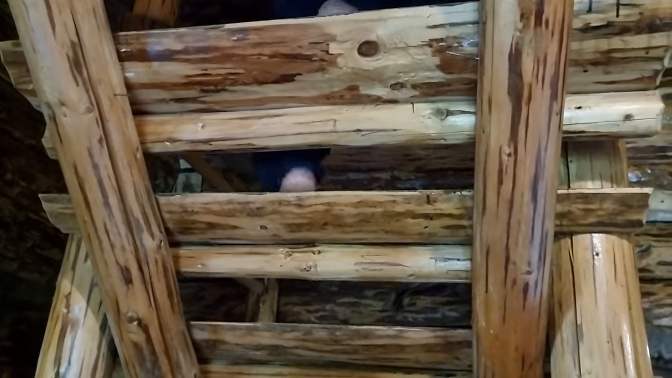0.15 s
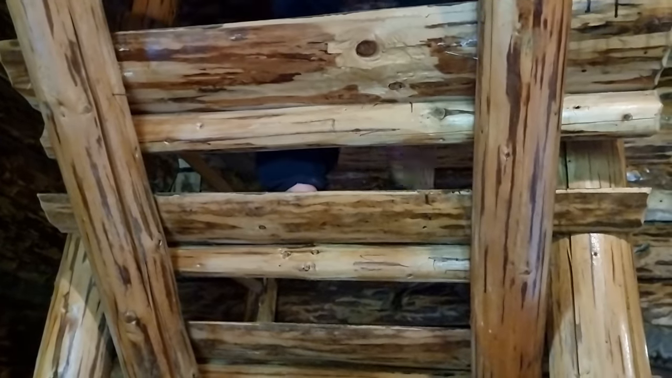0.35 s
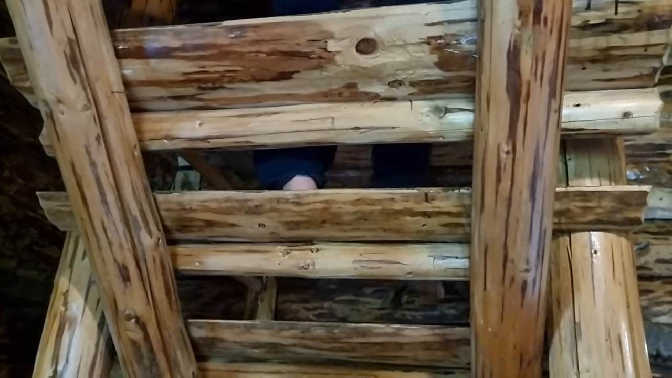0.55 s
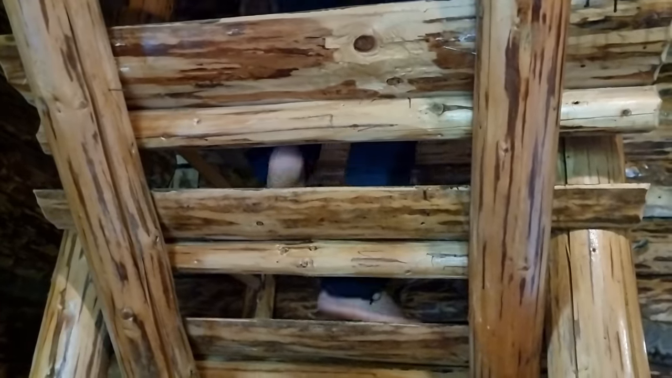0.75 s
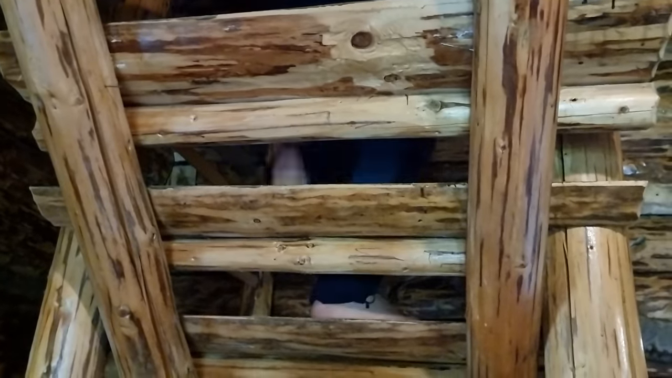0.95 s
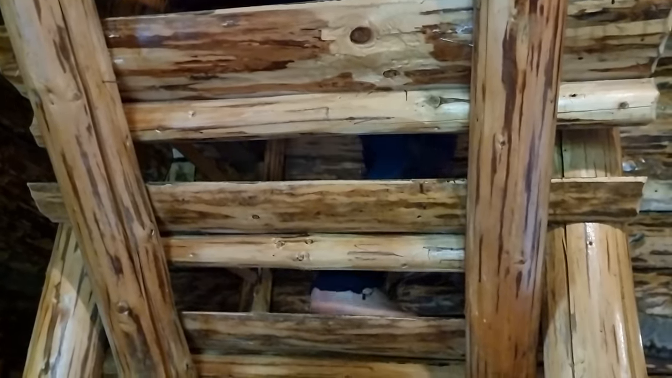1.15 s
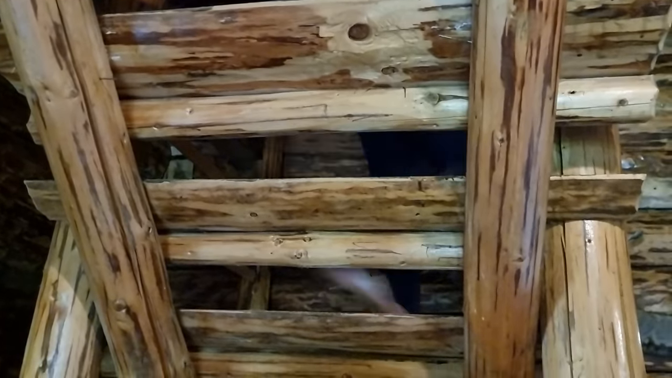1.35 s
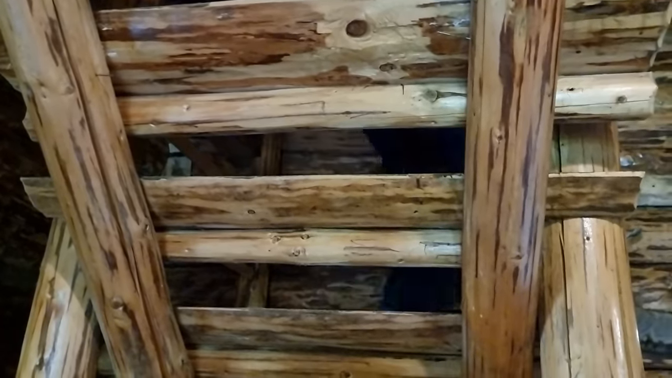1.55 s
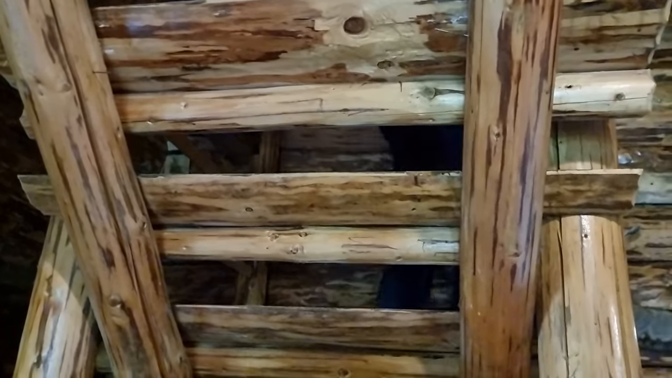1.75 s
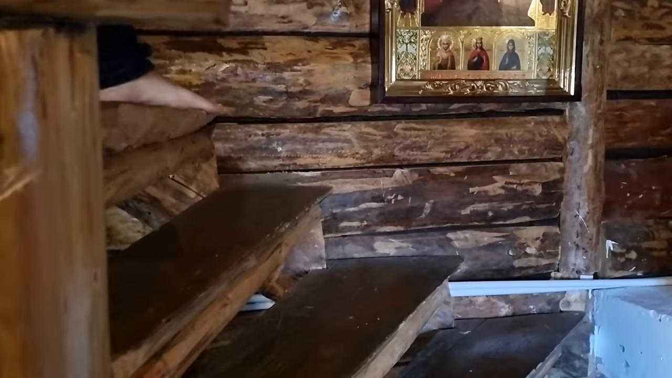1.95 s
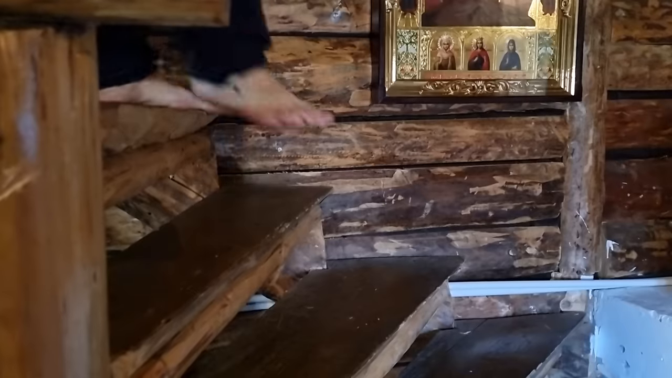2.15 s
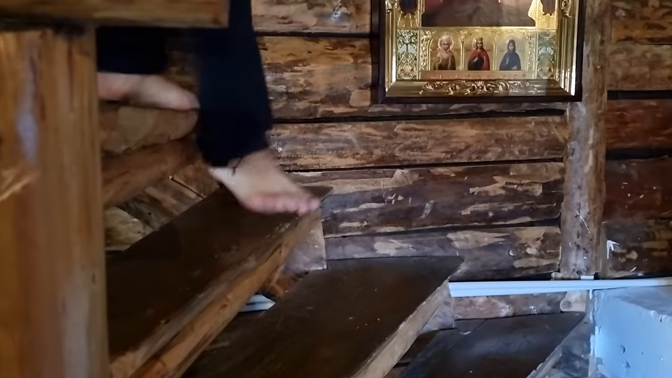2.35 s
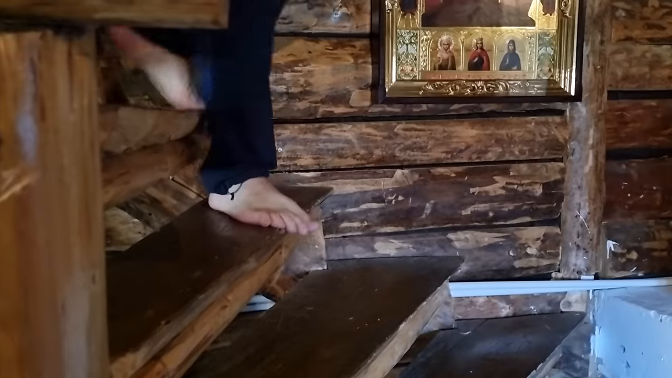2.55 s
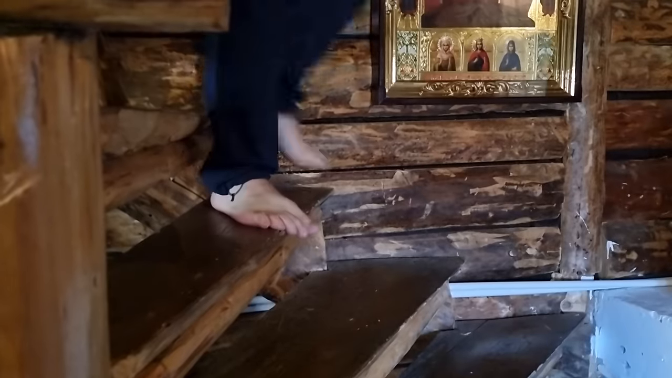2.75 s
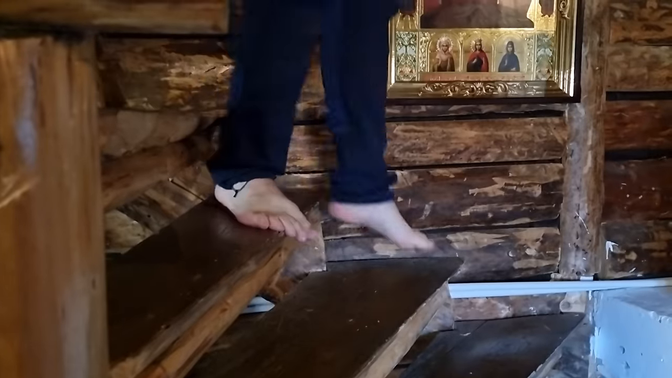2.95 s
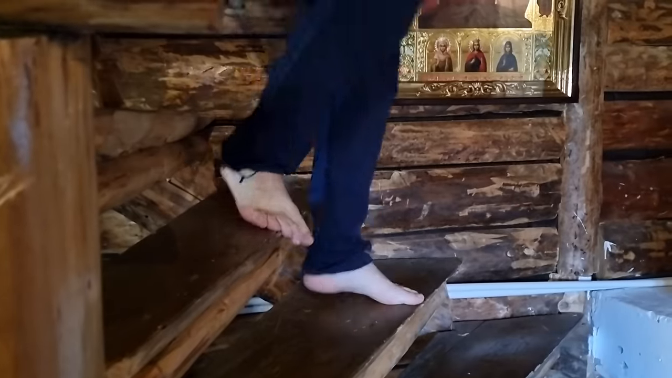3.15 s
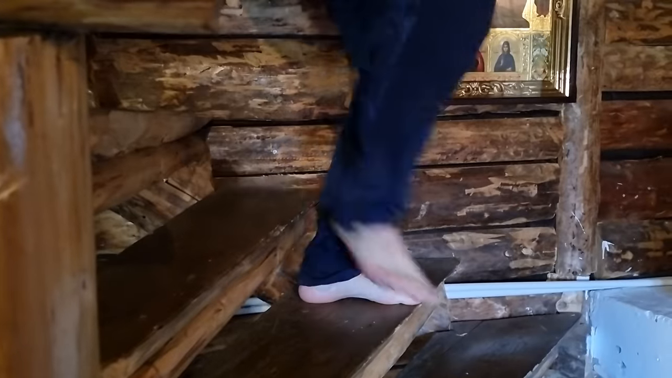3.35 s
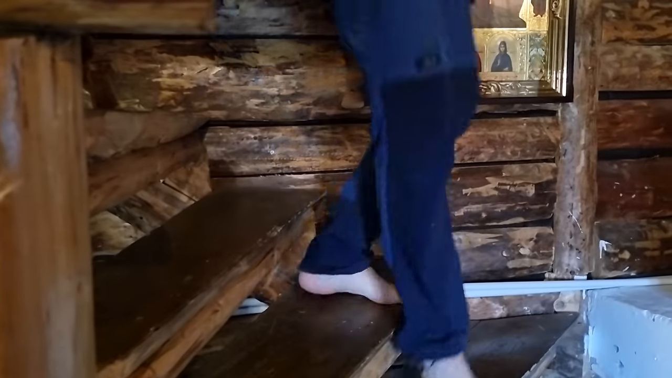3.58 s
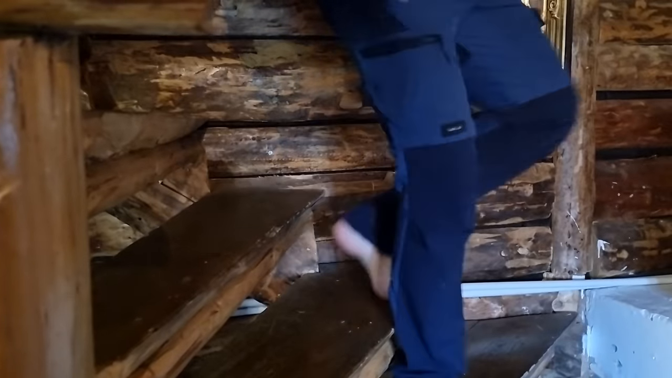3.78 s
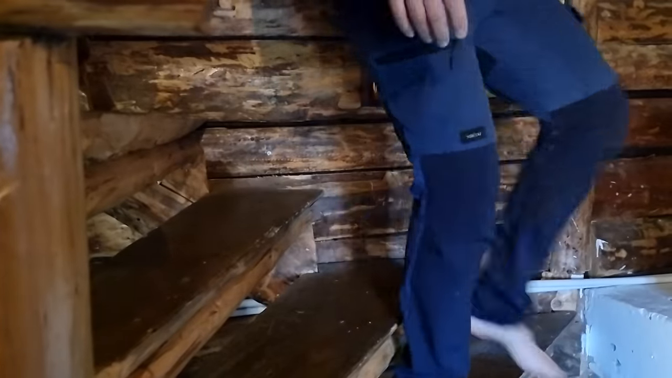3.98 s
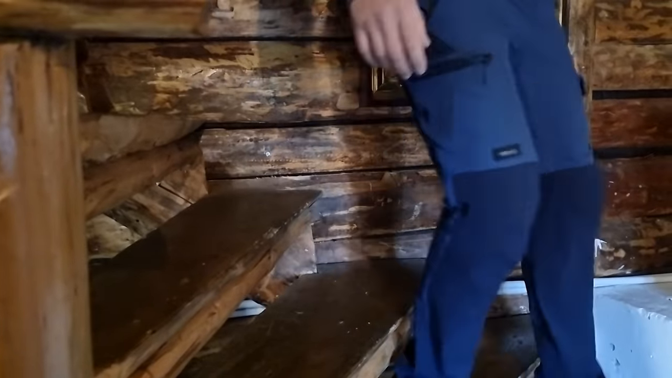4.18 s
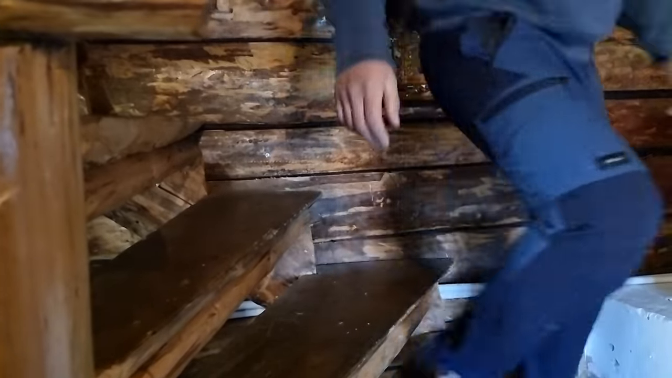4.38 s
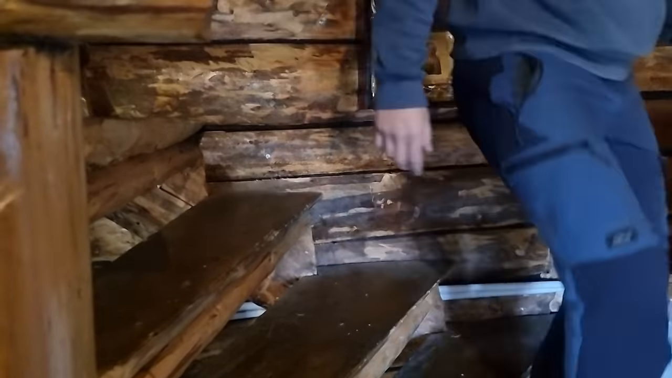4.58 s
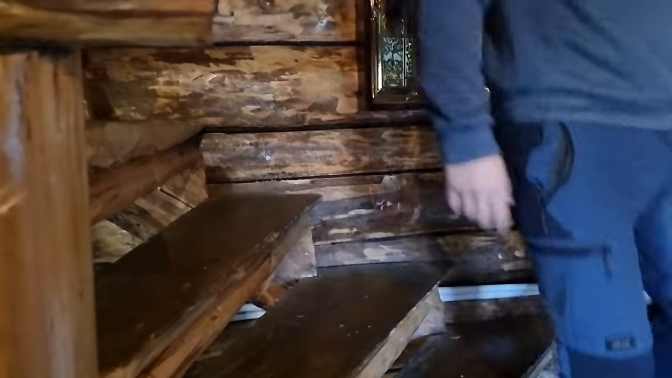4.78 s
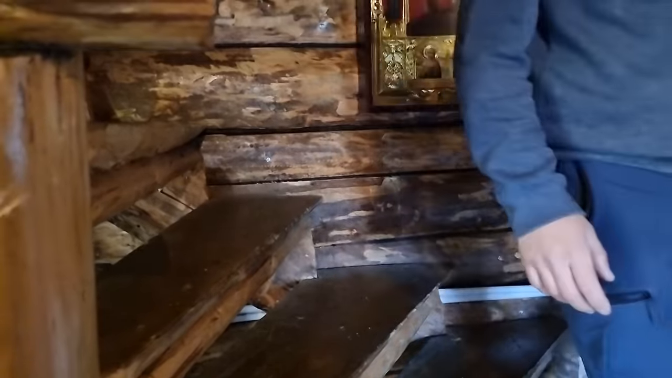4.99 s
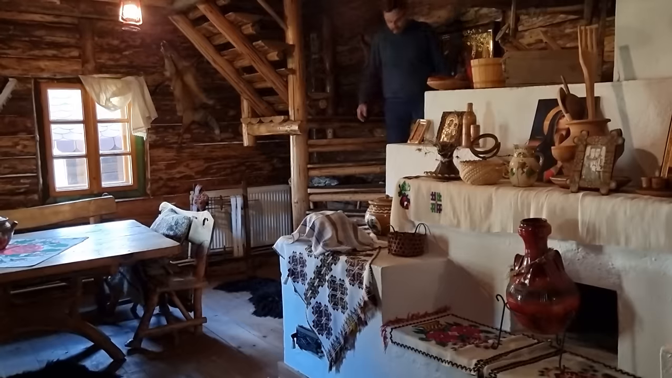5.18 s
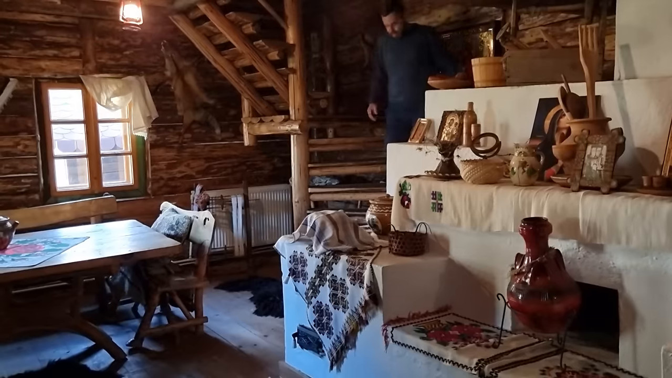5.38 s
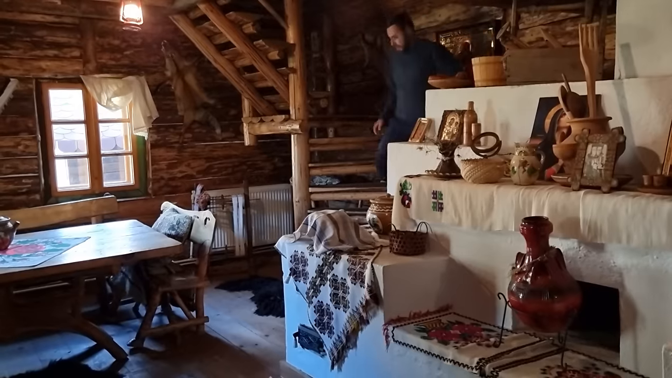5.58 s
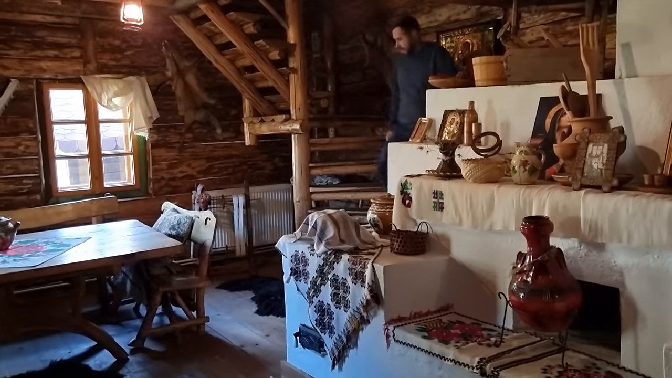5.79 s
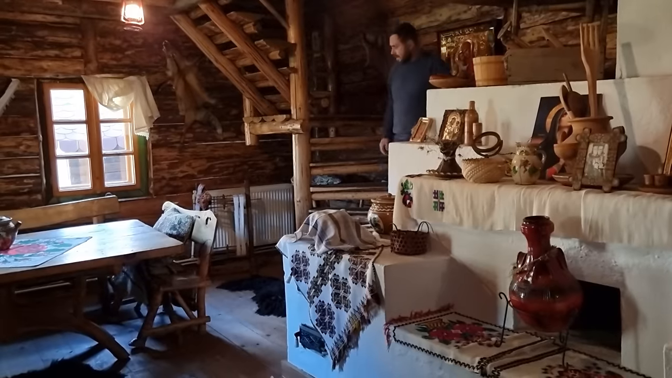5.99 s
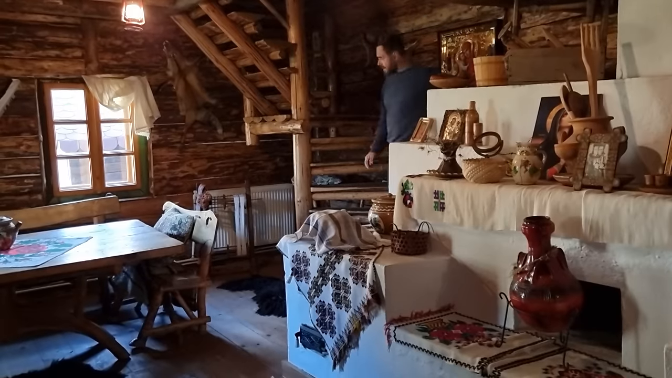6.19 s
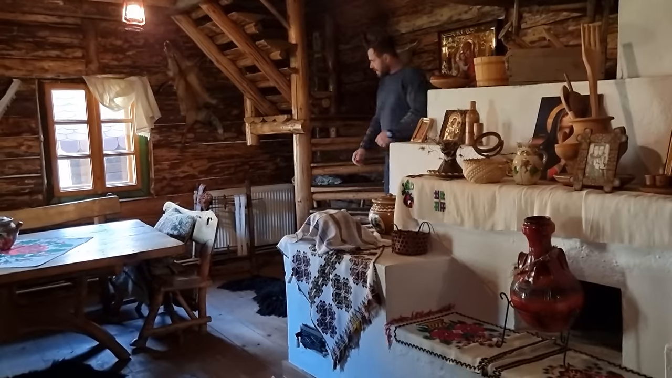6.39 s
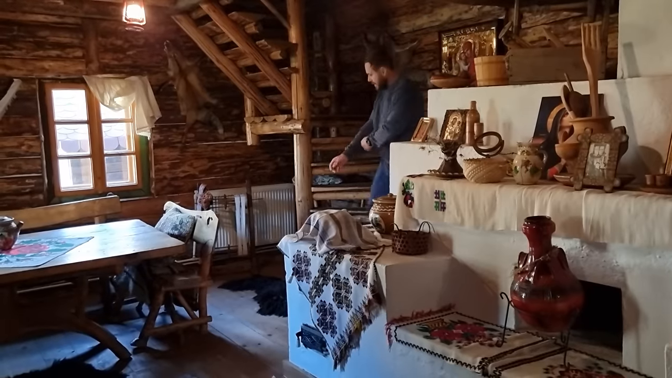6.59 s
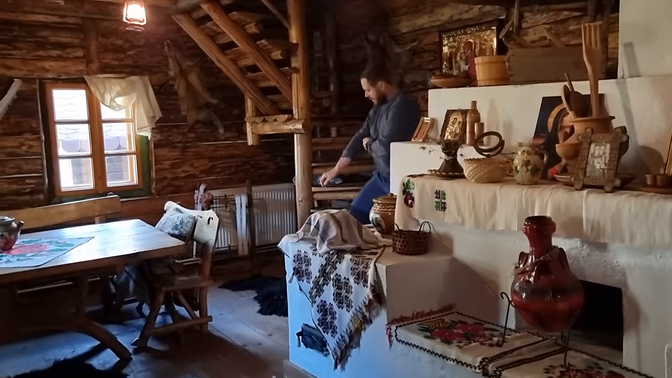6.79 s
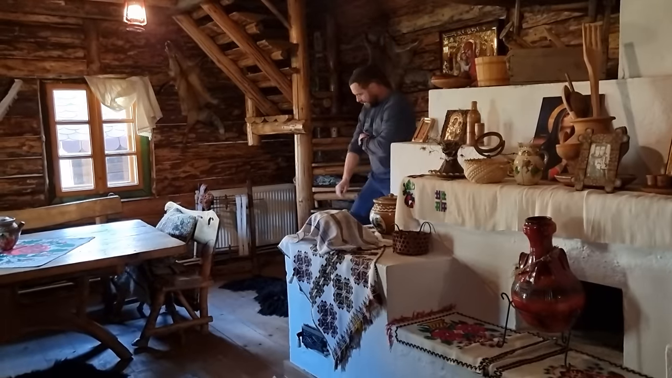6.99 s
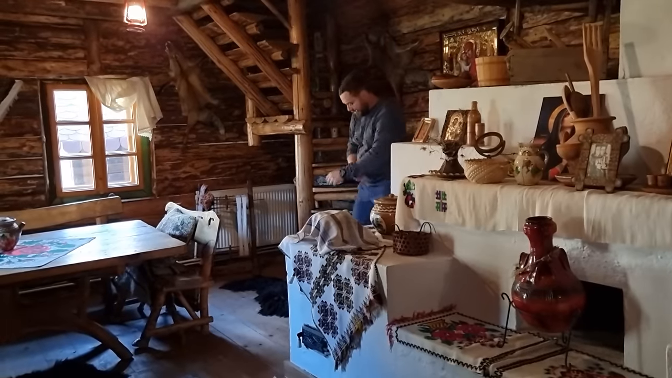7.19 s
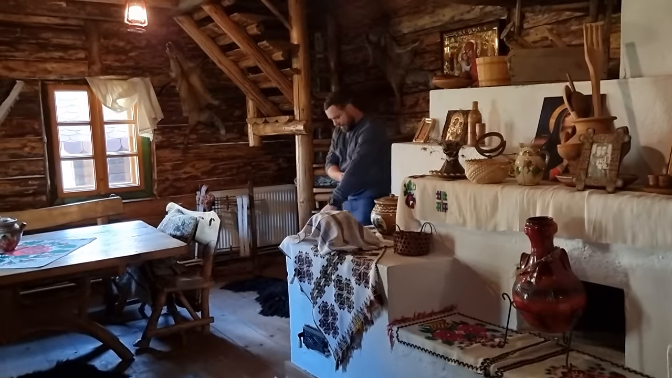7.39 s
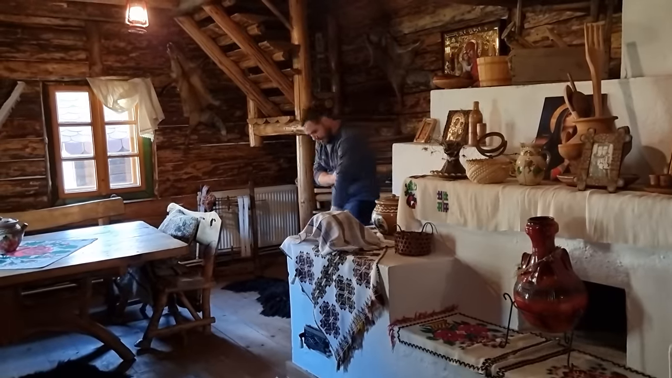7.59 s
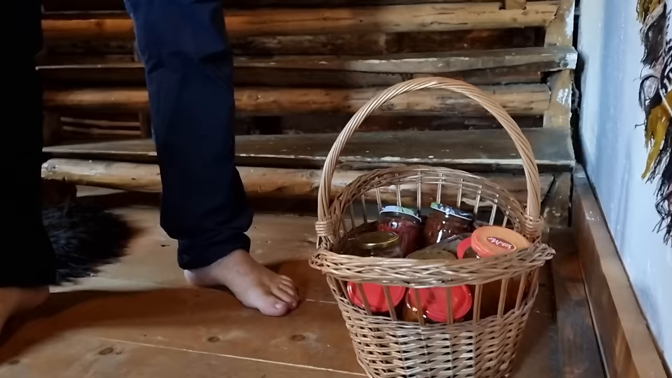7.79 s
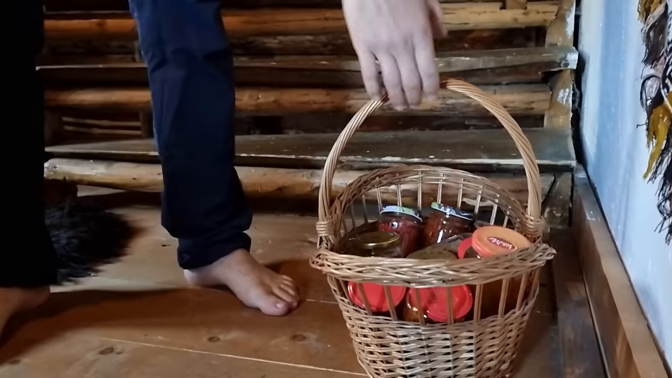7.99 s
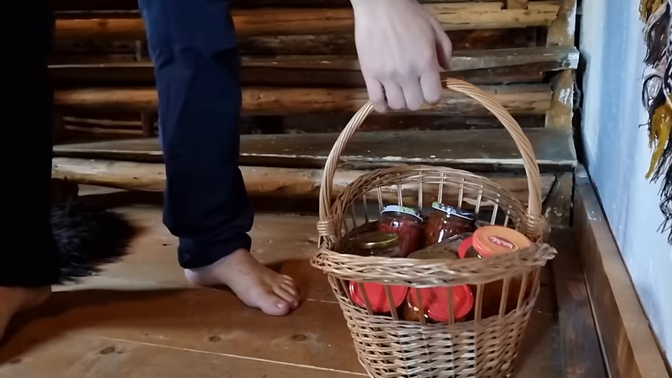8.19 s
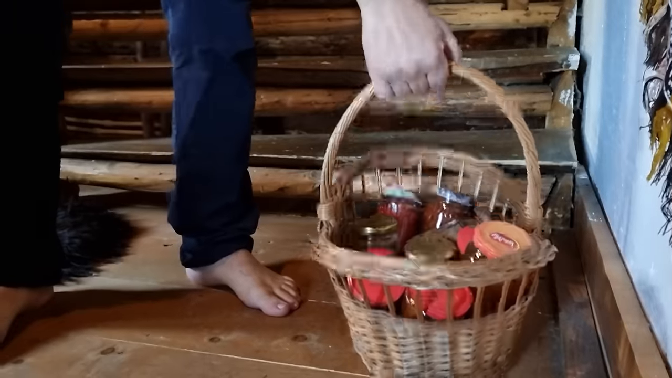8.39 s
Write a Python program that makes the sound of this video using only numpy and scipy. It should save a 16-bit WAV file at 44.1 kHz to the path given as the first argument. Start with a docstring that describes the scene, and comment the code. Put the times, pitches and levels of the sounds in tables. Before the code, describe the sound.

Dry joint cracks and dull board knocks come from under a staircase as someone walks down barefoot. The microphone then sits close to the treads: weighty thumps, skin slaps, hollow heel knocks, cloth brushing. From across the room the steps are sparse, muffled and more reverberant. A last close view has a soft step, rustling cloth and tiny crisp wicker ticks over quiet room air.

```python
"""Log house with steep wooden stairs and a board floor: bare feet come down and cross it in a quiet room.
Soles slap and heels knock: short bursts of contact grains through filters for skin, treads and boards.
Floor spans swing as decaying sines, dry joints crack in ringing modes, soles scuff as clumped friction noise.
Trousers rustle as shaped noise and a wicker basket ticks near the end, over low hum and hiss.
The listening place changes three times, and with it the echo level, the stereo delay and the room air."""
import sys
import numpy as np
from scipy import signal
from scipy.fft import rfft, irfft, next_fast_len
from scipy.io import wavfile
from scipy.ndimage import uniform_filter1d, map_coordinates

SR = 44100
rng = np.random.default_rng(int(sys.argv[2]) if len(sys.argv) > 2 else 0)


def waveform_to_disk(signal):
    """Save audio, clipped to [-1, 1], as 16-bit WAV at the path in sys.argv[1]."""
    frames = np.transpose(np.atleast_2d(signal))
    scaled = np.clip(frames, -1, 1) * 32767
    samples = np.round(scaled).astype(np.int16)
    wavfile.write(sys.argv[1], SR, samples)


N = 372204
SIZE = 32768  # samples per event
T = np.arange(SIZE) / SR  # s
HZ = np.fft.rfftfreq(SIZE, 1 / SR)
CUT_S = 1.92  # first change of listening place

# listening places: (from time [s], relative echo level [dB], lead of the left port [ms],
# air hiss level [dB], low hum level [dB])
VIEWS = [(0, -1.5, 0.51, -66.5, -64.5), (1.92, -5.5, 0.41, -67.5, -68.5), (5.103, -0.5, 0.29, -72.5, -74),
         (7.952, 0.5, 0.41, -68, -68)]
# murmur of the building: (frequency [Hz], relative level [dB])
RUMBLE = [(15, -17), (30, -2), (55, 1.5), (100, -9.5), (170, -17.5), (280, -21), (700, -53.5)]


def amp(db):
    """Decibels to gain."""
    return 10 ** (np.asarray(db) / 20)


def unit(x):
    """Scale to rms 1."""
    return x / np.sqrt(np.mean(x ** 2) + 1e-20)


def along(points, hz):
    """Interpolate (frequency [Hz], value) points on a log frequency axis."""
    f, v = np.transpose(points)
    return np.interp(np.log(hz + 1), np.log(f + 1), v)


def fade(t, t60_s):
    """Exponential decay by 60 dB in t60_s."""
    return np.exp(-np.log(1000) * t / np.maximum(t60_s, 1e-3))


def resonances(modes, steep=1):
    """Gain of (Hz, width Hz, dB) modes summed in power; steep ones leave deep valleys between them."""
    power = 0
    for hz, width_hz, db in modes:
        detuning = (HZ ** 2 - hz ** 2) / (HZ * width_hz + 1)
        power = power + amp(2 * db) / (1 + detuning ** 2) ** steep
    return np.sqrt(power)


def ring(drive, gain):
    """Filter a drive with the causal minimum-phase response that has this gain."""
    cepstrum = irfft(np.log(np.maximum(gain, 1e-6)))
    cepstrum[1:SIZE // 2] *= 2
    cepstrum[SIZE // 2 + 1:] = 0
    return irfft(rfft(drive) * np.exp(rfft(cepstrum)))


def bend(x, travel_1khz_s):
    """Bending waves in a plank run faster the higher they are: the treble arrives first."""
    root = np.sqrt(HZ * 1000)
    return irfft(rfft(x) * np.exp(-4j * np.pi * travel_1khz_s * root))


def contact(life_s, rise_s, grit, click):
    """Closing surfaces: a first click and a burst of uneven grains that fades by 60 dB in life_s."""
    grains = rng.standard_normal(SIZE) * np.exp(grit * rng.standard_normal(SIZE))
    burst = grains * fade(T, life_s) * (1 - np.exp(-T / rise_s))
    return burst / np.linalg.norm(burst) + click * (T == 0)


def shelves(body_db, snap_db):
    """Gain that raises or lowers the low body and the top snap."""
    return amp(along([(600, body_db), (1200, 0), (3800, 0), (7500, snap_db)], HZ))


def diffuse(spectrum, size):
    """Stereo noise from all sides, more alike in the bass than in the treble."""
    # (frequency [Hz], left-right correlation)
    alike = [(60, 0.82), (150, 1), (300, 0.25), (640, 0.3), (1300, -.15), (3000, -0.033)]
    m = next_fast_len(size, True)
    hz = np.fft.rfftfreq(m, 1 / SR)
    turn = np.arccos(np.clip(along(alike, hz), -1, 1)) / 2
    noise = rfft(rng.standard_normal((2, m))) * amp(along(spectrum, hz))
    mid, side = irfft(noise * [np.cos(turn), np.sin(turn)], m)[:, :size]
    return unit(np.array([mid + side, mid - side]))


def in_room(x, s, wet_db, early=0.32, early_t60_s=0.041, radiated=None):
    """Direct sound at both ports, dense echoes off near timber and a tail, fed by what radiates all round."""
    # log walls: (frequency [Hz], t60 [s])
    log_walls = [(80, 0.49), (260, 0.35), (700, 0.19), (1800, 0.2), (4500, 0.21), (12000, 0.16)]
    _, echo_db, lead_ms, _, _ = VIEWS[max(sum(s >= view[0] for view in VIEWS) - 1, 0)]
    hz, t, z = signal.stft(diffuse([(1, 0)], size=SIZE), SR, nperseg=256)
    decaying = z * fade(t, along(log_walls, hz)[:, None])
    tail = signal.istft(decaying, SR, nperseg=256)[1][:, :SIZE]
    tail = tail * (1 + early * fade(T, early_t60_s)) * (1 - np.exp(-T / 0.0067))
    delay_s = np.maximum([[-lead_ms], [lead_ms]], 0) / 1000
    direct = rfft(x) * np.exp(-2j * np.pi * HZ * delay_s)
    echoes = rfft(x if radiated is None else radiated) * rfft(tail) / np.linalg.norm(tail[0])
    return irfft(direct + amp(echo_db + wet_db) * echoes)


def add(track, s, pair, db, pan_db=0):
    """Lay in from time s, loudest 6 ms at db, left over right by pan_db; early sounds end at CUT_S."""
    peak = np.sqrt(uniform_filter1d(np.mean(pair ** 2, 0), size=256).max())
    start = round(s * SR)
    end = round(CUT_S * SR) if s < CUT_S else N
    length = min(SIZE, end - start)
    gain = amp([[db + pan_db / 2], [db - pan_db / 2]])
    track[:, start:start + length] += pair[:, :length] / peak * gain


def slaps(cup=1.66, cup_width_share=0.5, brush_db=-19, brush_s=.014):
    """A bare sole brushes the wood, then rolls on in a patter of contacts, squeezing out an air pocket."""
    # (time [s], level [dB], low body [dB], top snap [dB], contact life [s], cupped-air pitch [Hz])
    sole_hits = [(0.2105, -31.5, -24, 9.5, 0.011, 4200), (1.3713, -35, 1, -0.5, 0.038, 3200),
                 (1.8517, -54, 3, -8.5, 0.087, 2420), (2.579, -37, 5.5, -2, 0.14, 1610),
                 (2.6187, -33, 8.5, 3.5, 0.03, 3220), (3.134, -46.5, 7.5, 0, 0.14, 1620),
                 (3.1929, -27, 0.5, -1.5, 0.017, 1850), (3.2975, -31, 5, -5, 0.038, 1790),
                 (3.6955, -33, -5.5, -4, 0.079, 1580), (3.7244, -33, 4.5, -2.5, 0.053, 2400),
                 (4.333, -42, 1, -3.5, 0.078, 2250), (4.3675, -34.5, 2, -7.5, 0.028, 1510),
                 (4.393, -36, 12, -4, 0.17, 2100), (4.4535, -23, -2.5, 5, 0.025, 2200),
                 (4.463, -29, 0.5, -6, 0.047, 2400), (4.8214, -44, 0.5, -3, 0.036, 2880),
                 (4.854, -39, 6, -23, 0.012, 1790), (4.889, -19.5, -8, -11.5, 0.026, 2150),
                 (5.286, -48, 8.5, -41, 0.07, 1400), (5.57, -44.5, 8, -33, 0.11, 2130),
                 (6.112, -34.5, 1, -9.5, 0.083, 2190), (6.657, -44.5, -2.5, -12, 0.16, 2720),
                 (6.689, -40, 2.5, -3.5, 0.18, 1500), (7.395, -53, -5, -14, 0.14, 1260),
                 (8.134, -48.5, -2, -13.5, 0.094, 2700)]
    # skin on wood: (frequency [Hz], relative level [dB])
    skin = [(60, -22.5), (250, -1), (600, -1), (1000, 1), (1700, -4), (2500, -7), (3400, -7), (4800, -12),
            (6800, -9), (9500, -24.5), (14000, -23.5), (16000, -28.5)]
    out = np.zeros((2, N))
    lead = round(brush_s * SR)
    ramp = np.linspace(0, 1, lead)
    for s, db, body_db, snap_db, life_s, hz in sole_hits:
        # a slow contact also swells more slowly
        patter = np.roll(contact(life_s, rise_s=0.041 * life_s, grit=0.92, click=0.041), lead)
        brush = amp(brush_db) * patter[lead:2 * lead].std() * ramp * rng.standard_normal(lead)
        patter[:lead] += brush
        air_pocket = 1 + cup * resonances([(hz, cup_width_share * hz, 0)], steep=2.7)
        gain = amp(along(skin, HZ)) * shelves(body_db, snap_db) * air_pocket
        pair = in_room(ring(patter, gain), s, wet_db=7, early=3.7)
        add(out, s - lead / SR, pair, db, pan_db=-4)
    return out


def heels():
    """A padded heel on a thick lower tread wakes mainly its low modes: a hollow tock."""
    # (time [s], level [dB], contact life [s])
    heel_hits = [(2.622, -19, 0.0029), (3.232, -23.5, 0.013), (3.765, -25.5, 0.0095)]
    # tread modes: (frequency [Hz], width [Hz], relative level [dB])
    tread = [(430, 99, -19), (589.5, 77, -4.5), (740, 150, -4.5), (830, 69, -0.5), (1157, 140, -12.5),
             (1260, 72, -14)]
    out = np.zeros((2, N))
    gain = resonances(tread) * amp(along([(100, 11.0), (400, 0.5), (3000, -2.5), (9000, -20)], HZ))
    for s, db, life_s in heel_hits:
        landing = contact(life_s, rise_s=0.00055, grit=0.83, click=2.9)
        tock = bend(ring(landing, gain), travel_1khz_s=0.00151)
        add(out, s, in_room(tock, s, wet_db=5.5), db, pan_db=0.1)
    return out


def knocks(width_hz=130, boost=4.2):
    """Boards shifting under the foot, or kicked by a slipping joint, answer dully around their own pitch, with
    a slight downward chirp."""
    # (time [s], level [dB], pitch [Hz], contact life [s])
    board_knocks = [(0.152, -40.5, 300, 0.091), (0.278, -41, 300, 0.043), (0.938, -44, 277, 0.2),
                    (0.97, -35.5, 794, 0.02), (1.143, -53.5, 385, 0.4), (1.225, -35, 268, 0.056),
                    (1.322, -38, 377, 0.089), (1.381, -35.5, 475, 0.079), (2.789, -54, 600, 0.04),
                    (2.812, -48.5, 814, 0.05), (2.841, -49, 480, 0.058), (2.923, -49.5, 733, 0.05),
                    (3.02, -52.5, 620, 0.06), (3.049, -45.5, 650, 0.055), (3.297, -37.5, 725, 0.051),
                    (3.793, -35, 637, 0.2), (3.865, -42, 1020, 0.032), (4.396, -34.5, 510, 0.12),
                    (4.621, -44.5, 305, 0.04), (4.664, -39, 1550, 0.029), (4.737, -42, 470, 0.025),
                    (4.893, -30.5, 520, 0.078), (5.107, -42, 1310, 0.084), (6.149, -30.5, 620, 0.09),
                    (6.67, -46.5, 237, 0.067), (7.531, -57.5, 290, 0.09), (7.866, -62.5, 1200, 0.02)]
    # board response: (frequency [Hz], relative level [dB])
    board = [(40, -11.5), (150, -3), (300, -2.5), (600, -6.5), (1100, -6.5), (2000, -16.5), (4000, -26),
             (10000, -44)]
    out = np.zeros((2, N))
    for s, db, hz, life_s in board_knocks:
        gain = amp(along(board, HZ)) * (1 + boost * resonances([(hz, width_hz, 0)]))
        shift = contact(life_s, rise_s=0.0033, grit=0.16, click=1.0)
        knock = bend(ring(shift, gain), travel_1khz_s=.005)
        add(out, s, in_room(knock, s, wet_db=4.5), db, pan_db=-4.5)
    return out


def thumps(rumble_db=-11, rumble_t60_s=0.42, rise_s=0.015):
    """Body weight swings a floor span in its low modes, one row a mode; the rest of the house rumbles with it."""
    # (time [s], level [dB], pitch [Hz], t60 [s])
    weight_shifts = [(0.213, -41, 81, 0.15), (0.276, -30.5, 76.5, 0.17), (0.602, -49, 69.6, 0.094),
                     (0.785, -38.5, 65, 0.14), (1.225, -40, 198.3, 0.45), (1.377, -32, 69.4, 0.13),
                     (2.449, -45, 99, 0.075), (2.561, -37.5, 48.7, 0.11), (3.16, -44.5, 70.7, 0.19),
                     (3.225, -40, 65, 0.15), (3.297, -43.5, 171, 0.15), (3.721, -28, 52, 0.077),
                     (3.837, -32.5, 50.7, 0.1), (4.36, -36.5, 68, 0.12), (4.394, -36.5, 172, 0.18),
                     (4.48, -42, 205, 0.08), (4.937, -32.5, 74.6, 0.058), (5.562, -44.5, 150, 0.084),
                     (6.15, -37, 90.7, 0.27), (6.153, -44, 127.5, 0.25), (6.151, -42.5, 267, 0.25),
                     (6.75, -41, 42.9, 0.25), (7.385, -44.5, 138, 0.15), (7.98, -36, 75.9, 0.16),
                     (8.212, -51.5, 97, 0.12)]
    out = np.zeros((2, N))
    load = 1 - np.exp(-(T / rise_s) ** 2)
    for s, db, hz, t60_s in weight_shifts:
        swing = np.sin(2 * np.pi * hz * T) * fade(T, t60_s)
        house = amp(rumble_db) * diffuse(RUMBLE, size=SIZE)[0] * fade(T, rumble_t60_s)
        add(out, s, in_room(load * (swing + house), s, wet_db=-11), db, pan_db=-2.4)
    return out


def floorboards():
    """A soft push of the foot sets a loose board humming briefly in two low modes."""
    # (time [s], level [dB], contact life [s])
    board_dips = [(5.625, -41, 0.11), (5.69, -46.5, 0.05), (5.922, -57, 0.24), (6.175, -32, 0.097)]
    # two modes and a broad floor: (frequency [Hz], width [Hz], relative level [dB])
    loose_board = [(310, 22, 1.5), (461, 20, -6), (900, 3500, -18)]
    out = np.zeros((2, N))
    gain = resonances(loose_board) / np.sqrt(1 + (HZ / 1100) ** 4)
    for s, db, life_s in board_dips:
        push = contact(life_s, rise_s=0.012, grit=0.13, click=0.3)
        add(out, s, in_room(ring(push, gain), s, wet_db=-2), db, pan_db=-4.0)
    return out


def cracks(focus=1.5, width_share=0.32, blur=0.23):
    """A dry joint slips; the nearest beam rings clearly, the room hears the whole frame a little blurred."""
    # (time [s], level [dB], low body [dB], top snap [dB], strongest pitch [Hz], damping [x mode width])
    joint_slips = [(0.1497, -36.5, -2, -9, 2300, 4), (0.171, -49.5, -3, 9, 6500, 6),
                   (0.2212, -30, 8, 7, 1152, 2.5), (0.277, -32, 7.5, -6, 1190, 3),
                   (0.3001, -31, 5.5, -7, 1850, 3), (0.316, -47, 12, -26, 1400, 2),
                   (0.3806, -40, -6, -31, 2770, 2), (0.7508, -39, 4.5, -2, 2360, 6),
                   (0.8407, -40, 3, -20, 1123, 1.3), (0.8691, -32, 1.5, -1, 1000, 5),
                   (0.968, -35, 2, -10, 1400, 5), (1.2215, -12.5, -2, -2.5, 2998, 1.15),
                   (1.31, -37, 8, -18, 1215, 3), (1.479, -26.5, 3, -2.5, 3200, 1.1),
                   (1.905, -34, -1, -3.5, 1070, 4)]
    # joint modes: (frequency [Hz], width before damping [Hz], relative level [dB])
    joint = [(260, 140, -1), (590, 100, -8), (850, 270, -4), (1080, 120, 8.5), (1741, 57, 2),
             (1960, 290, -5.5), (2820, 140, -1.5), (3200, 260, -1.5), (3480, 160, -9.5), (4250, 220, -6.5),
             (6060, 900, -14.5), (7900, 3300, -19.5), (14200, 7000, -24.5)]
    out = np.zeros((2, N))

    def frame(damping):
        """Joint modes widened by the damping."""
        return resonances([(f, width * damping, level) for f, width, level in joint], steep=1.3)

    for s, db, body_db, snap_db, hz, damping in joint_slips:
        # one sharp slip and a quick run of smaller ones
        life_s = 0.0081 * (1 + np.sqrt(damping))
        slip = bend(contact(life_s, rise_s=0.00091, grit=0.73, click=1.1), travel_1khz_s=.0015)
        tilt = shelves(body_db, snap_db) * (1 + focus * resonances([(hz, width_share * hz, 0)]))
        near = ring(slip, frame(damping) * tilt)
        whole = ring(slip, frame(damping + blur) * tilt)
        pair = in_room(unit(near), s, wet_db=2.0, early=4.0, radiated=unit(whole))
        add(out, s, pair, db, pan_db=-4.0)
    return out


def scuffs(grit=0.84, clumping=0.65):
    """Soles and hems slide: clumped friction grains swell with the foot's speed and fade as it stops."""
    # (loudest at [s], level [dB], swell [s], fade t60 [s], lower edge [Hz])
    slides = [(2.036, -54.5, 0.095, 0.19, 1027), (2.321, -57.5, 0.0093, 0.06, 1145),
              (2.475, -49, 0.09, 0.32, 800), (2.555, -41, 0.05, 0.1, 430), (5.556, -49.5, 0.023, 0.26, 790),
              (6.039, -60.5, 0.013, 0.17, 1120), (7.497, -52.5, 0.016, 0.046, 2400)]
    # sliding friction: (frequency [Hz], relative level [dB])
    friction = [(900, 5.5), (2800, -1.5), (7200, -13), (10000, -29), (16000, -29)]
    out = np.zeros((2, N))
    for s, db, swell_s, t60_s, edge_hz in slides:
        speed = np.minimum(T / swell_s, 1) * fade(np.maximum(T - swell_s, 0), t60_s)
        catches = unit(uniform_filter1d(rng.standard_normal(SIZE), size=256))
        unevenness = np.exp(grit * rng.standard_normal(SIZE) + clumping * catches)
        grains = rng.standard_normal(SIZE) * unevenness
        gain = amp(along(friction, HZ)) / np.sqrt(1 + (edge_hz / (HZ + 1)) ** 8)
        add(out, s - swell_s, in_room(ring(grains * speed, gain), s, wet_db=6.5), db, pan_db=-5.5)
    return out


def trousers(gain_db=16.5, flutter_db=-0.1, flutter_hz=16):
    """Cloth brushes cloth as the legs swing close by: shaped noise with a very slight flutter."""
    # one table a stretch: (time [s], level before gain_db [dB])
    stretches = [
        [(2.2, -91.5), (2.38, -79), (2.53, -79.5), (2.93, -85), (3.42, -81), (5.02, -80.5), (5.15, -81),
         (5.25, -105)],
        [(7.97, -82.5), (8.184, -79.5), (8.44, -91.5)],
    ]
    # (frequency [Hz], relative level [dB])
    cloth = [(150, -39), (250, -8.5), (723, -6), (1220, -4), (2320, -11), (6590, -12), (10200, -26.5),
             (16000, -22)]
    knots = rng.standard_normal(int(N * flutter_hz / SR) + 4)
    flutter = map_coordinates(knots, [np.arange(N) * flutter_hz / SR])
    brushing = np.zeros(N)
    for stretch in stretches:
        s, db = np.transpose(stretch)
        brushing += np.interp(np.arange(N) / SR, s, amp(db), left=0, right=0)
    return brushing * amp(gain_db + flutter_db * flutter) * diffuse(cloth, size=N)


def basket():
    """Wicker strands slip over each other under the hand in short, crisp ticks close by."""
    # (time [s], level [dB])
    ticks = [(8.057, -46), (8.066, -47.5), (8.073, -61), (8.1115, -48), (8.184, -54.5), (8.2567, -66),
             (8.2751, -54), (8.2982, -53), (8.321, -56.5), (8.3333, -48), (8.342, -60), (8.366, -60)]
    # (frequency [Hz], relative level [dB])
    wicker = [(60, -35), (350, -14), (800, 13.5), (1500, -6.5), (4000, 2), (7500, 3), (10000, -7),
              (15000, 2)]
    out = np.zeros((2, N))
    gain = amp(along(wicker, HZ))
    for s, db in ticks:
        slips = contact(life_s=.014, rise_s=.001, grit=1.2, click=.8)
        add(out, s, in_room(ring(slips, gain), s, wet_db=-5), db, pan_db=-6.5)
    return out


def room_air(dip_db=-14, recover_s=0.13):
    """Faint hiss and the building's low murmur, steady in each place; the level dips briefly at CUT_S."""
    # hiss: (frequency [Hz], relative level [dB])
    hiss = [(30, -7), (170, -12), (370, -2), (550, -10), (2700, -9), (3900, -14.5), (4700, -22.5),
            (6800, -20.5), (16000, -48.5)]
    start_s, _, _, air_db, hum_db = np.transpose(VIEWS)
    t = np.arange(N) / SR
    place = np.searchsorted(start_s[1:], t)
    dip = amp(dip_db * (t > CUT_S) * np.exp(-np.abs(t - CUT_S) / recover_s))
    murmur = amp(hum_db[place]) * diffuse(RUMBLE, size=N)
    air = amp(air_db[place]) * diffuse(hiss, size=N)
    return dip * (murmur + air)


def scene():
    """The walker in the quiet house."""
    feet = slaps() + heels() + scuffs()
    wood = knocks() + thumps() + floorboards() + cracks()
    return feet + wood + trousers() + basket() + room_air()


def record(dry):
    """Band limit: a 500 Hz wide linear edge centred on top_hz."""
    top_hz = 16000
    m = next_fast_len(N + SIZE, True)
    passed = np.clip((top_hz - np.fft.rfftfreq(m, 1 / SR)) / 500 + .5, 0, 1)
    return irfft(rfft(dry, m) * passed, m)[:, :N]


dry = scene()
out = record(dry)
waveform_to_disk(out)
```